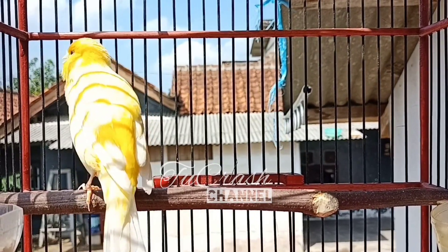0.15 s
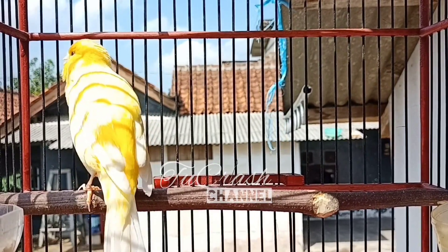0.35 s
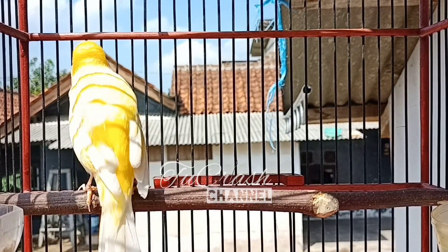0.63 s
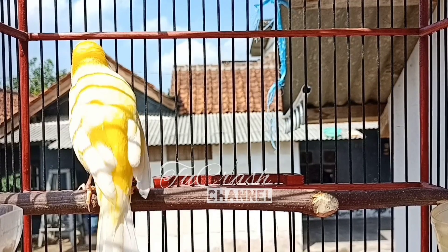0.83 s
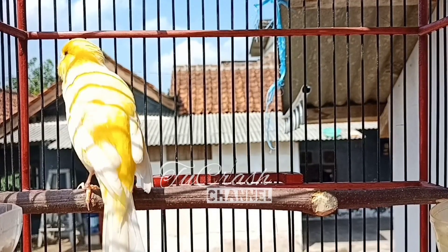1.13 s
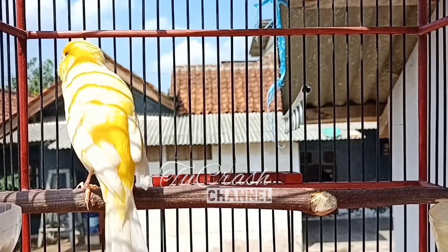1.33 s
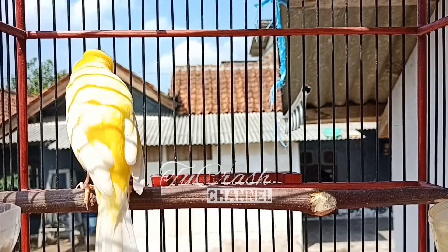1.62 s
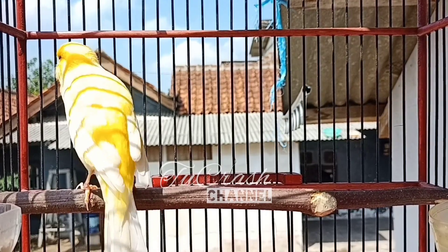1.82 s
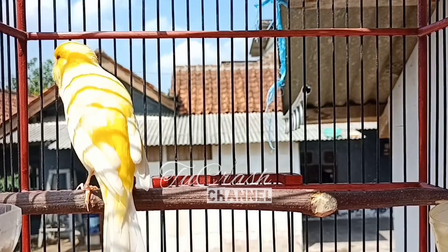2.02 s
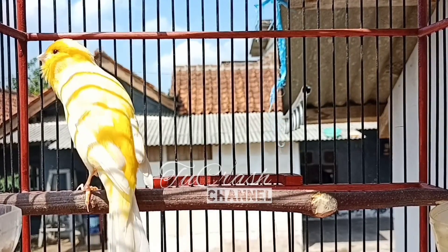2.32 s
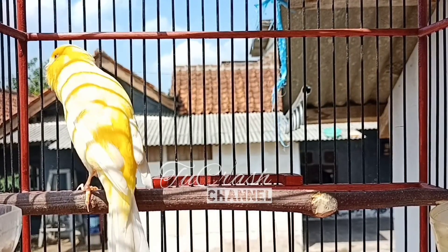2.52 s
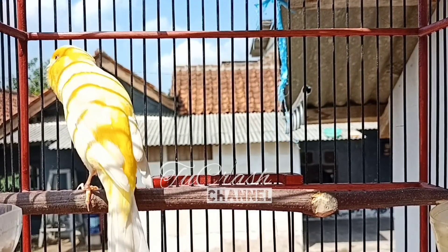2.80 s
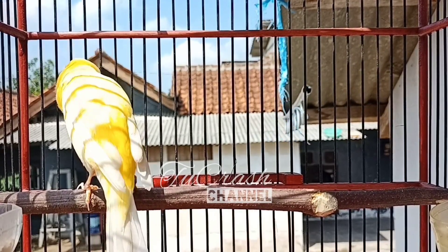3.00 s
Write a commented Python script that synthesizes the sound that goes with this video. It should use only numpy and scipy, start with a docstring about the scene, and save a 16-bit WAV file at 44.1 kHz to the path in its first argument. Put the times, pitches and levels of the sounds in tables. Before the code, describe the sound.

A canary sings close to the microphone outdoors: five quick falling chirps, six longer falling whistles, a tiny pip, a rattling trill, then rising whistles, with short wall echoes over faint low traffic.

```python
"""The echo of a chirp already over dies away above rumbling far traffic and a faint hooting; then a caged
canary, close by outdoors, sings five quick falling chirps, six long falling whistles, a short pip,
a rattling trill and rising whistles. Its whistles are gliding sines with fluttering overtones and breath
noise, its trill a row of clicks with soft low notes; nearby walls answer with smeared echoes. The far
traffic is coloured noise with two wavering low tones, the hooting soft sines; a faint hiss lies under all."""
import sys
import numpy as np
from scipy import signal
from scipy.fft import rfft, irfft, next_fast_len
from scipy.io import wavfile
from scipy.ndimage import uniform_filter1d, map_coordinates

SR = 44100
rng = np.random.default_rng(int(sys.argv[2]) if len(sys.argv) > 2 else 0)


def store_wav(level_fs):
    """Save 16-bit WAV to argv[1]."""
    pcm = np.round(np.clip(np.atleast_2d(level_fs), -1, 1) * 32767)
    wavfile.write(sys.argv[1], SR, pcm.T.astype(np.int16))


N = 138915  # samples
TOP_HZ = 15900

# Traffic: noise spectrum of the rumble [f/Hz, relative level/dB]
RUMBLE_SPECTRUM = [(18, -58), (30, -36), (40, -14.5), (53, -3.5), (70, -3.5), (87, -13.5), (118, 1.5),
                   (135, -2), (157, -14), (221, -7.5), (279, -15), (295, -20), (322, -36.5), (420, -44),
                   (550, -74.5), (920, -120)]
RUMBLE_DB = -46
# Engine notes [f/Hz, level/dB, waver rate/(knots per s)]
ENGINE_NOTES = [(68, -50, 6), (119, -54, 10)]
# Mid rush that comes and goes [t/s, level/dB], and its spectrum [f/Hz, relative level/dB]
RUSH_LEVEL = [(0, -64.5), (.5, -71.5), (.8, -89), (1.8, -93), (2, -72.5), (2.7, -85.5), (2.8, -99)]
RUSH_SPECTRUM = [(280, -2.8), (500, -4), (700, -12.5), (1000, -6), (1300, -14.5), (1600, -24), (1700, -90)]
# Spectrum of the faint hiss [f/Hz, relative level/dB]
HISS_SPECTRUM = [(300, -7.5), (450, 7), (700, -20.5), (1000, -4), (1400, -48), (2100, -6), (5000, -25),
                 (15000, -42.5)]
HISS_DB, HISS_PATCHY_DB = -72, 10
# Far hooting notes [start t/s, length/s, f/Hz, level/dB]
HOOT_NOTES = [(0, 0.38, 504, -57), (0.352, 0.32, 433.5, -58.5), (0.549, 0.16, 385, -59),
              (0.723, 0.17, 526, -69.5), (0.737, 0.19, 430, -62.5), (0.876, 0.16, 511, -55.5),
              (1.046, .1, 454, -62.5), (1.13, .07, 513, -67)]
HOOT_OCTAVE_DB = -22.5

# Wall echoes, levels before the echo colour [delay t/s, level/dB]
WALL_ECHOES = [(.007, -18), (.027, -27.5), (.044, -24), (.085, -40)]
WALL_SMEAR_S = .012
# Time for the diffuse tail to fall by 60 dB [f/Hz, t/s]
TAIL_DECAY = [(1500, 0.12), (3500, 0.44), (6000, 0.34), (12000, 0.6)]
TAIL_DB = -22.5  # before the echo colour
# Colour of all reflected sound [f/Hz, level/dB]
ECHO_COLOUR = [(1000, -9), (5000, 4.27), (8000, 0), (16000, -4)]

# Trill beats [t/s, click level/dB, f/Hz, level of the low note/dB]
TRILL_BEATS = [(1.8553, -20, 3340, -78), (1.8846, -20, 3530, -70), (1.9127, -20.5, 3480, -64),
               (1.943, -18.5, 3370, -64), (1.9744, -17.5, 3396, -70), (2.0061, -17.5, 3270, -62),
               (2.0395, -15, 3240, -52.5), (2.0726, -16, 3160, -46), (2.1058, -17, 3097, -44),
               (2.1385, -16, 3086, -45), (2.1733, -19.5, 3120, -43.5), (2.2054, -18.5, 3110, -41),
               (2.2398, -17.5, 3010, -44), (2.2727, -16.5, 3053, -46), (2.3069, -19, 3106, -44.5),
               (2.3411, -17, 3027, -42.5), (2.3749, -18.5, 3057, -42.5), (2.411, -16.5, 3046, -42.5),
               (2.4432, -16.5, 3090, -45.5), (2.479, -16.5, 3120, -43.5), (2.5146, -17, 3038, -47.5),
               (2.5505, -20.5, 2920, -43), (2.5856, -19, 3110, -43.5), (2.6211, -20.5, 3030, -39),
               (2.657, -18.5, 3060, -41), (2.6931, -19.5, 3080, -41)]
CLICK_UP_S, CLICK_DOWN_S, CLICK_LEAD_S = .0039, .0039, .0015
CLICK_SWEEP, CLICK_RICH_DB = .13, -12.5  # sweep as a share of the pitch; overtone level
# The opening beats are shorter, wider and doubled until they settle [start t/s, end t/s]
SETTLE_S = (1.98, 2.1)
OPEN_SHORTER, OPEN_SWEEP, OPEN_DOUBLE_DB = .45, .22, -4.5
# Soft notes after a click: two low ones and a brief falling piece near the click's pitch, which starts #
# between them [delay t/s, length/s, start f/Hz, end f/Hz, level over the low note/dB]
AFTER_NOTES = [(0.003385, 0.0087, 1886, 1680, 1), (0.016, 0.019, 1620, 1800, -6.5),
               (.004, 0.0086, 3600, 2300, 7.5)]
# Spectrum of the breathy buzz [f/Hz, relative level/dB]
BUZZ_SPECTRUM = [(1500, -49), (1700, 3), (2300, -1), (3200, 7.5), (3800, -2.5), (4500, -38.5), (5700, -9.5),
                 (6400, -44), (7200, -7.5), (9000, -24.5), (14000, -20.5), (16500, -32)]
BUZZ_DB = -27  # relative to the click

# One chirp as a contour [t/s, f/Hz, level/dB]
CHIRP_CONTOUR = [(.209, 6900, -55), (.213, 6900, -44), (.2219, 6940, -28), (.2238, 6800, -31),
                 (.2265, 6400, -50), (.2335, 5500, -33), (.2361, 5200, -39), (.2383, 4980, -23),
                 (.2422, 4670, -22), (.2453, 4470, -40), (.2467, 4380, -28), (.25, 4140, -20),
                 (.253, 3850, -25), (.2568, 3530, -11.5), (.2592, 3350, -19), (.2627, 3150, -9.5),
                 (.2645, 3050, -15), (.266, 2950, -24), (.2678, 2750, -25), (.2705, 2350, -36),
                 (.273, 2050, -42), (.275, 1900, -58)]
# Its repeats; the earliest ends before time zero, so only its echoes are heard [shift t/s, change of level/dB]
CHIRP_REPEATS = [(-.292, -1.8), (-.1945, -2.2), (-.0973, -1.1), (0, 0), (0.0996, -0.4), (0.1946, -1)]
# Falling whistles, one contour each [t/s, f/Hz, level/dB]
FALL_CONTOURS = [
    [(0.498, 7300.0, -55), (0.507, 6740.0, -34.5), (0.5115, 6680.0, -26.5), (0.5176, 6650.0, -46),
     (0.527, 6600.0, -30.5), (0.5304, 6570.0, -49), (0.5351, 6510.0, -35), (0.5613, 6170.0, -42),
     (0.5683, 6120.0, -29.5), (0.5844, 5920.0, -28), (0.6028, 5260.0, -30.5), (0.6075, 5020.0, -14),
     (0.6115, 4790.0, -17), (0.6199, 4340.0, -18), (0.6215, 4260.0, -29), (0.6243, 4130.0, -9.5),
     (0.6288, 3940.0, -14), (0.6331, 3800.0, -18), (0.6381, 3660.0, -12.5), (0.6407, 3600.0, -28),
     (0.6435, 3510.0, -18), (0.65, 3200.0, -42.5)],
    [(0.678, 7030.0, -54), (0.71, 6800.0, -24.5), (0.7227, 6540.0, -40), (0.7253, 6480.0, -62),
     (0.7295, 6370.0, -32), (0.7339, 6250.0, -43), (0.7458, 5970.0, -22), (0.751, 5870.0, -36),
     (0.7632, 5680.0, -24), (0.783, 5420.0, -54), (0.791, 5280.0, -22), (0.8077, 4830.0, -16.5),
     (0.8107, 4730.0, -25), (0.8206, 4380.0, -18.5), (0.8233, 4280.0, -41), (0.8255, 4200.0, -14.5),
     (0.8289, 4070.0, -14.5), (0.8361, 3810.0, -19.5), (0.8411, 3630.0, -11), (0.8434, 3550.0, -18.5),
     (0.8461, 3450.0, -17), (0.8483, 3360.0, -26.5), (0.8494, 3320.0, -32), (0.856, 3000.0, -57)],
    [(0.886, 6950.0, -35), (0.8935, 6970.0, -31), (0.9177, 6790.0, -22), (0.9289, 6680.0, -33.5),
     (0.9377, 6590.0, -25.5), (0.9624, 6240.0, -45.5), (0.9733, 6040.0, -24), (0.9809, 5900.0, -38),
     (0.9914, 5710.0, -18), (1.0081, 5410.0, -31.5), (1.0155, 5280.0, -32.5), (1.029, 5010.0, -19),
     (1.0338, 4900.0, -44), (1.0366, 4820.0, -20), (1.0402, 4730.0, -18.5), (1.0466, 4520.0, -44),
     (1.049, 4440.0, -27), (1.0561, 4160.0, -14), (1.0627, 3890.0, -20.5), (1.069, 3630.0, -9.5),
     (1.0754, 3390.0, -22.5), (1.0775, 3330.0, -20.5), (1.0811, 3250.0, -30), (1.085, 3220.0, -45)],
    [(1.108, 7070.0, -50), (1.1176, 6950.0, -33.5), (1.1432, 6830.0, -24), (1.1561, 6630.0, -36.5),
     (1.1612, 6530.0, -28), (1.1752, 6210.0, -45.5), (1.1835, 6030.0, -22), (1.1886, 5930.0, -50),
     (1.1987, 5750.0, -18.5), (1.2342, 5310.0, -36.5), (1.2449, 5110.0, -20), (1.2529, 4910.0, -27),
     (1.2562, 4810.0, -15.5), (1.2624, 4600.0, -33), (1.2648, 4510.0, -40), (1.2673, 4410.0, -19.5),
     (1.2694, 4330.0, -34), (1.2735, 4150.0, -13), (1.2794, 3890.0, -21), (1.2859, 3610.0, -11.5),
     (1.2919, 3370.0, -17), (1.2956, 3250.0, -40), (1.2977, 3190.0, -31.5), (1.299, 3150.0, -59)],
    [(1.338, 6900.0, -48.5), (1.3474, 7000.0, -27.5), (1.3664, 6900.0, -26), (1.3997, 6380.0, -32.5),
     (1.4135, 6120.0, -17), (1.4215, 5960.0, -35.5), (1.4333, 5750.0, -18), (1.4385, 5660.0, -42),
     (1.45, 5480.0, -29.5), (1.4686, 5210.0, -24.5), (1.4863, 4850.0, -18), (1.4924, 4670.0, -21.5),
     (1.4942, 4610.0, -41), (1.5034, 4270.0, -16), (1.5069, 4130.0, -17.5), (1.5127, 3900.0, -36),
     (1.5158, 3780.0, -10.5), (1.5202, 3640.0, -18.5), (1.5233, 3560.0, -12.5), (1.5262, 3520.0, -16.5),
     (1.5303, 3520.0, -44), (1.5336, 3590.0, -37), (1.5339, 3600.0, -31), (1.534, 3600.0, -64)],
    [(1.574, 7010.0, -47), (1.5784, 6950.0, -35.5), (1.6088, 6780.0, -21.5), (1.622, 6560.0, -32),
     (1.6427, 6060.0, -19), (1.6454, 6000.0, -21.5), (1.648, 5930.0, -36), (1.6568, 5740.0, -22),
     (1.6688, 5510.0, -39), (1.6745, 5410.0, -25.5), (1.6838, 5250.0, -27), (1.6932, 5080.0, -13.5),
     (1.6988, 4960.0, -24), (1.7036, 4840.0, -10.5), (1.7085, 4710.0, -18.5), (1.7157, 4470.0, -30.5),
     (1.7233, 4170.0, -14), (1.7287, 3940.0, -28), (1.7366, 3610.0, -9), (1.7441, 3340.0, -17.5),
     (1.7487, 3240.0, -18), (1.7542, 3230.0, -43), (1.7549, 3240.0, -40), (1.755, 3240.0, -35)],
]
# Pip, long rising whistle and last rising whistle, all [t/s, f/Hz, level/dB]
PIP_CONTOUR = [(1.809, 3340, -50), (1.816, 3320, -31), (1.82, 3160, -17), (1.8245, 3160, -21),
               (1.828, 3265, -17.5), (1.831, 3140, -17.5), (1.834, 3294, -25), (1.838, 3180, -25.5),
               (1.842, 3180, -43)]
RISE_CONTOUR = [(2.758, 2020, -58), (2.782, 2800, -21), (2.788, 2880, -18.5), (2.7938, 2785, -19.5),
                (2.8, 2880, -24.5), (2.8187, 3088, -10), (2.8311, 3127, -15), (2.8642, 3325, -16),
                (2.8717, 3340.0, -22), (2.8741, 3360, -16.5), (2.8762, 3290, -24), (2.8781, 3350, -25.5),
                (2.882, 3330, -27.5), (2.8837, 3350, -16), (2.8854, 3374, -29), (2.8876, 3390, -23.5),
                (2.8895, 3420, -29.5), (2.891, 3470, -22.5), (2.9027, 3430, -18), (2.9148, 3460, -14.5),
                (2.9182, 3515, -18.5), (2.9289, 3501, -16), (3.0089, 3539, -26), (3.0235, 3555, -24),
                (3.0307, 3583, -26.5), (3.042, 3573, -30), (3.0509, 3607, -35.5), (3.058, 3630, -55.5)]
LAST_CONTOUR = [(3.097, 1922, -64), (3.12, 2434, -35.5), (3.13, 2570, -33), (3.138, 2740, -22),
                (3.16, 2763, -22)]
# Overtones of the syrinx [multiple of the fundamental, relative level/dB]
OVERTONES = [(2, -30.5), (3, -23.5), (4, -26.5), (5, -27.5)]
# Overtone colour of the beak [f/Hz, level/dB]
BEAK_COLOUR = [(3000, 11), (6000, -0.5), (8000, 2.1), (10500, -4.1), (12500, -2.5), (15000, 8),
               (16500, -4.5)]
# Overtone strength by kind of note; the tilt is per overtone step in the rising notes
CHIRP_RICH_DB, FALL_RICH_DB, PIP_RICH_DB, RISE_RICH_DB, RISE_TILT_DB = 2.5, 1.55, -16, -2, -4.5
FLUTTER_DB, FLUTTER_RATE = 4.5, 91.2  # rate in knots a second
SMOOTH_S = .06  # span over which the effort follows the level
OVERTONE_ROUGH, OVERTONE_FADE = 1.3, .3  # higher overtones die faster as the note softens
OVERTONES_WAKE_DB = -25  # level at which a rising note's overtones are at half amplitude
# Spectrum of the breath [f/Hz, relative level/dB]
BREATH_SPECTRUM = [(1800, -40.5), (4000, -12), (6500, -15.5), (8000, -8), (12000, -3.5), (15000, -2.8),
                   (16500, 7)]
BREATH_DB = -13
BREATHY_HZ_PER_S = 20000  # glide speed at which the glide factor is one half


def amp(db):
    """Level law: decibels to an amplitude gain."""
    return 10 ** (np.asarray(db) / 20)


def unit(x):
    """Normalisation: a signal scaled to rms 1."""
    return x / np.sqrt(np.mean(x ** 2) + 1e-20)


def along(points, hz):
    """Logarithmic frequency scale: interpolation between (f/Hz, value) points."""
    f, v = np.transpose(points)
    return np.interp(np.log(hz + 1), np.log(f + 1), v)


def wobble(rate, size):
    """Slow random modulation: a smooth curve through rate random knots a second."""
    knots = rng.standard_normal(int(size * rate / SR) + 4)
    return map_coordinates(knots, [np.arange(size) * rate / SR])


def filtered(x, response, size=N):
    """Linear filtering: the spectrum of x times a response over frequency."""
    m = next_fast_len(size + SR // 2)
    hz = np.fft.rfftfreq(m, 1 / SR)
    return irfft(rfft(x, m) * response(hz), m)[..., :size]


def noise(spectrum, patchy_db):
    """Coloured noise of rms 1: random gains in time-frequency patches, then spectral shaping."""
    z = signal.stft(rng.standard_normal(N), nperseg=2048)[2]
    field = uniform_filter1d(rng.standard_normal(z.shape), 3, 0)
    field = uniform_filter1d(field, 3, 1)
    x = signal.istft(z * amp(patchy_db * unit(field)), nperseg=2048)[1][:N]
    # nothing sounds at or below the first frequency of the spectrum
    return unit(filtered(x, lambda hz: amp(along(spectrum, hz)) * (hz > spectrum[0][0])))


def add(track, s, piece):
    """Superposition: mix a piece into the track at time s."""
    i = round(s * SR)
    piece, i = piece[max(-i, 0):], max(i, 0)
    track[i:i + len(piece)] += piece[:max(len(track) - i, 0)]


def blip(length, start_hz, end_hz, rise, bend=1):
    """Frequency glide: peaked envelope and phase of a short note; rise = share before the peak."""
    u = np.linspace(0, 1, max(round(length * SR), 8))
    peak = np.clip(rise, .05, .95)
    shape = np.interp(u, [0, peak, 1], [0, 1, 0]) * signal.windows.tukey(len(u), .4)
    pitch = start_hz + (end_hz - start_hz) * u ** bend
    return uniform_filter1d(shape, size=len(u) // 7 + 1), 2 * np.pi * np.cumsum(pitch) / SR


def traffic():
    """Broadband and tonal noise: low rumble, two wavering engine notes, a patchy mid rush."""
    sound = amp(RUMBLE_DB) * noise(RUMBLE_SPECTRUM, patchy_db=5)
    for hz, db, rate in ENGINE_NOTES:
        gain = amp(db + 2.9 * wobble(rate, size=N))
        pitch = hz + 3.5 * wobble(rate, size=N)
        sound += gain * np.sin(2 * np.pi * np.cumsum(pitch) / SR)
    rush_db = np.interp(np.arange(N) / SR, *np.transpose(RUSH_LEVEL))
    return sound + amp(rush_db) * noise(RUSH_SPECTRUM, patchy_db=13.5)


def hiss():
    """Stationary coloured noise: a faint hiss of fixed spectrum and uneven grain."""
    return amp(HISS_DB) * noise(HISS_SPECTRUM, HISS_PATCHY_DB)


def hoots():
    """Harmonic tones: soft far notes with an octave above, unsteady in phase and level."""
    far = np.zeros(N)
    for s, length, hz, db in HOOT_NOTES:
        shape, phase = blip(length, hz * 1.01, hz * .99, rise=.22)
        phase += .96 * wobble(25, size=len(shape))
        gain = amp(db + 3 * wobble(18, size=len(shape))) * np.sqrt(shape)
        add(far, s, gain * (np.sin(phase) + amp(HOOT_OCTAVE_DB) * np.sin(2 * phase)))
    return far


def yard_response():
    """Impulse response: smeared wall echoes and a diffuse tail decaying at each frequency's rate."""
    hz, t, z = signal.stft(rng.standard_normal(SR // 2), SR, nperseg=256)
    decay = amp(-60 * t / along(TAIL_DECAY, hz)[:, None])
    tail = signal.istft(z * decay, SR, nperseg=256)[1]
    response = np.pad(amp(TAIL_DB) * tail / np.linalg.norm(tail), (150, 0))
    smear = int(WALL_SMEAR_S * SR)
    for delay, db in WALL_ECHOES:
        burst = unit(rng.standard_normal(smear) * np.linspace(1, .1, smear))
        add(response, delay, amp(db) * burst / np.sqrt(smear))  # burst energy 1 before its level
    return response


def yard(x):
    """Reflection as convolution: echoes and tail redrawn at random each fifth of a second, crossfaded."""
    wet, step = np.zeros(len(x)), SR // 5
    for centre in range(0, len(x) + step, step):
        response = yard_response()
        start, end = max(centre - step, 0), min(centre + step, len(x))
        nearness = 1 - abs(np.arange(start, end) - centre) / step
        piece = x[start:end] * np.clip(nearness, 0, 1) ** .5  # equal-power crossfade
        add(wet, start / SR, signal.fftconvolve(piece, response))
    return filtered(wet, lambda hz: amp(along(ECHO_COLOUR, hz)), size=len(x))


def trill():
    """Pulsed phonation: short upward clicks, each followed by soft notes over a breathy buzz."""
    song, air = np.zeros(N), np.zeros(N)
    for s, db, hz, low_db in TRILL_BEATS:
        opening = np.interp(s, SETTLE_S, [1, 0])
        shorter = 1 - OPEN_SHORTER * opening
        length = (CLICK_UP_S + CLICK_DOWN_S) * shorter
        sweep = CLICK_SWEEP + OPEN_SWEEP * opening
        rise = CLICK_UP_S / (CLICK_UP_S + CLICK_DOWN_S)
        shape, phase = blip(length, hz * (1 - sweep * 1.3), hz * (1 + sweep * .5), rise, bend=.3)
        tone = np.sin(phase)
        for k, over_db in OVERTONES[:3]:
            tone += amp(over_db + CLICK_RICH_DB) * wobble(1000, size=len(shape)) * np.sin(k * phase)
        click = amp(db) * shape * tone
        add(song, s - CLICK_LEAD_S * shorter, click)
        add(song, s + .0015, click * amp(OPEN_DOUBLE_DB) * opening)  # doubling of the opening beats
        for delay, after_s, start_hz, end_hz, after_db in AFTER_NOTES:
            ends_hz = np.multiply([start_hz, end_hz], rng.normal(1, .03, 2))
            shape, phase = blip(after_s, *ends_hz, rise=.35)
            gain = amp(low_db + after_db + rng.normal(0, 1.4))
            add(song, s + delay, gain * shape * np.sin(phase + rng.uniform(0, 2 * np.pi)))
        puff = blip(.04, 1, 1, rise=.066)[0]  # envelope only
        add(air, s, amp(db + BUZZ_DB) * puff)
    return song + air * noise(BUZZ_SPECTRUM, patchy_db=7)


def sung_notes():
    """Order of song: each whistle's contour with its overtone strength and tilt in dB."""
    notes = [(np.add(CHIRP_CONTOUR, [shift, 0, db]), CHIRP_RICH_DB, 0) for shift, db in CHIRP_REPEATS]
    notes += [(fall, FALL_RICH_DB, 0) for fall in FALL_CONTOURS]
    notes += [(PIP_CONTOUR, PIP_RICH_DB, 0)]
    return notes + [(rise, RISE_RICH_DB, RISE_TILT_DB) for rise in (RISE_CONTOUR, LAST_CONTOUR)]


def whistles(lead):
    """Syrinx as oscillator: sine, fluttering overtones, glide-fed breath; starts lead samples early."""
    song, effort = np.zeros(N + lead), np.zeros(N)
    for contour, rich_db, tilt_db in sung_notes():
        s, hz, db = np.transpose(contour)
        t = np.arange(s[0], s[-1], 1 / SR)
        pitch = uniform_filter1d(np.interp(t, s, hz), size=len(t) // 14, mode="nearest")
        gain = amp(np.interp(t, s, db)) * signal.windows.tukey(len(t), .04)
        gain = uniform_filter1d(gain, size=60)
        drive = uniform_filter1d(gain, int(SMOOTH_S * SR), mode="constant")
        phase = 2 * np.pi * np.cumsum(pitch) / SR
        tone = gain * np.sin(phase)
        glide = abs(np.gradient(pitch)) * SR  # Hz per second
        fast = glide / (glide + BREATHY_HZ_PER_S)
        # in rising notes the overtones wait until the note has once been loud
        loudest = np.maximum.accumulate(gain) + 1e-6
        rising = hz[-1] > hz[0]
        awake = 1 / (1 + (amp(OVERTONES_WAKE_DB) / loudest) ** 4 * rising)
        for k, over_db in OVERTONES:
            flutter_db = FLUTTER_DB * wobble(FLUTTER_RATE, size=len(t))
            level_db = over_db + rich_db + tilt_db * (k - 2) + flutter_db + along(BEAK_COLOUR, k * pitch)
            grain = awake * (1 + OVERTONE_ROUGH * fast * wobble(600, size=len(t)))
            strength = np.sqrt(abs(drive * gain)) * abs(drive * 8) ** (OVERTONE_FADE * (k - 2))
            in_band = k * pitch < SR * .45
            tone += strength * grain * amp(level_db) * in_band * np.sin(k * phase)
        add(song, s[0] + lead / SR, np.sqrt(2) * tone)
        add(effort, s[0], drive ** 1.62 * fast)
    song[lead:] += effort * amp(BREATH_DB) * noise(BREATH_SPECTRUM, patchy_db=3)
    return song


def scene():
    """Superposition: the far background, the bird and its reflections."""
    background = traffic() + hoots() + hiss()
    lead = SR // 10  # early start, so that echoes of the first chirp reach time zero
    bird = whistles(lead) + np.pad(trill(), (lead, 0))
    return ((bird + yard(bird))[lead:] + background)[None]


def record(dry):
    """Band limitation: nothing is kept at or above the top frequency."""
    return filtered(dry, lambda hz: hz < TOP_HZ)


dry = scene()
out = record(dry)
store_wav(out)
```